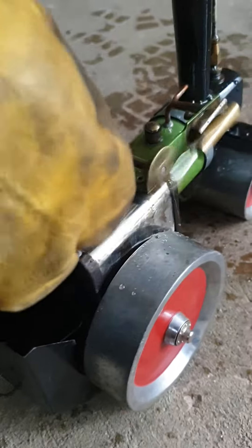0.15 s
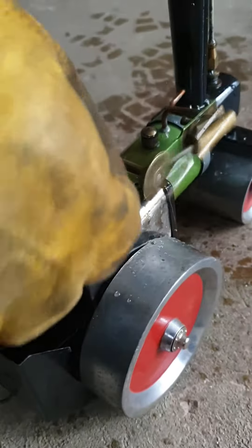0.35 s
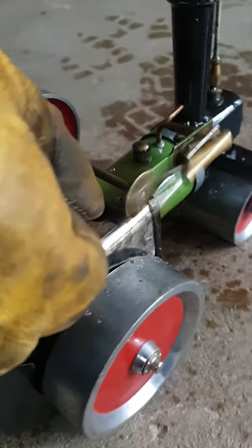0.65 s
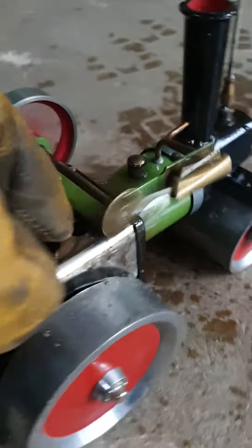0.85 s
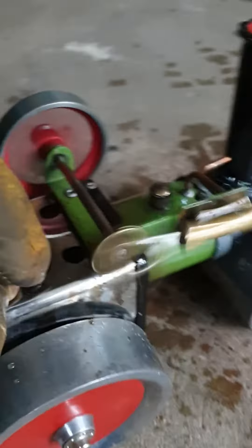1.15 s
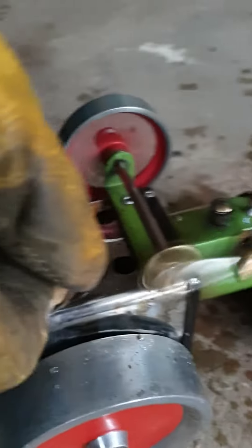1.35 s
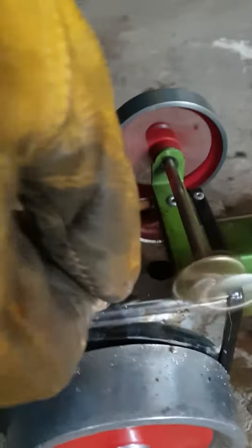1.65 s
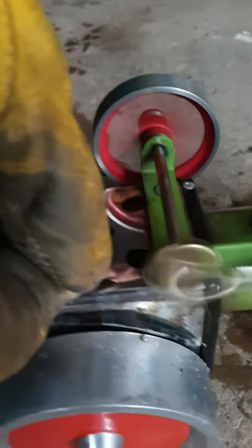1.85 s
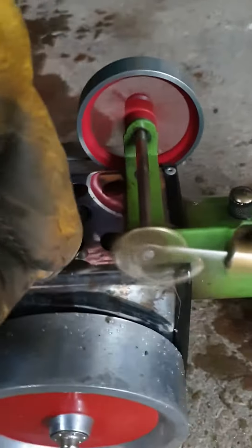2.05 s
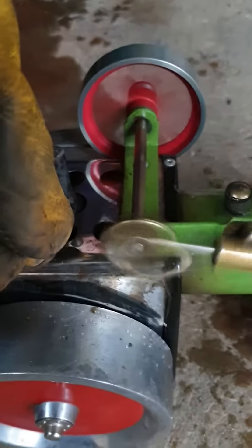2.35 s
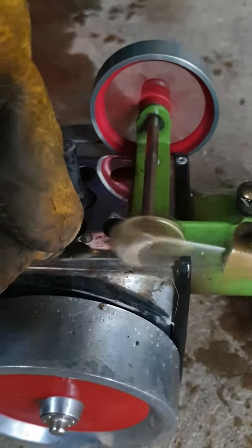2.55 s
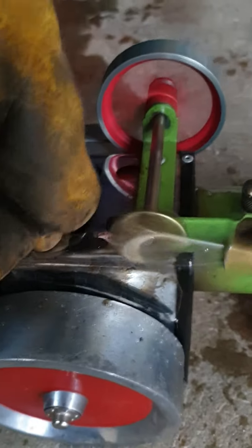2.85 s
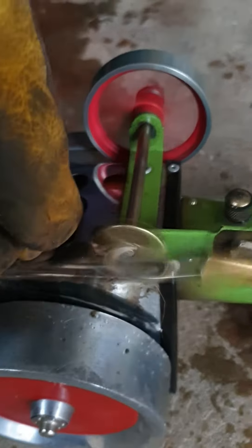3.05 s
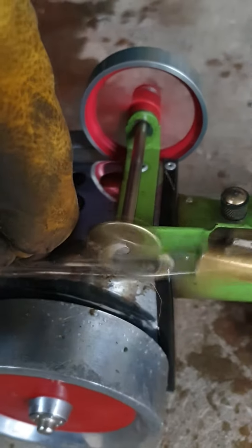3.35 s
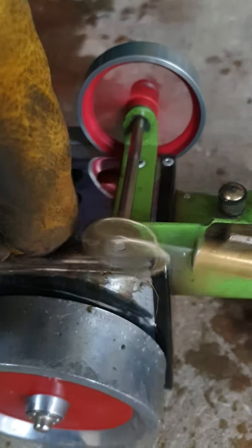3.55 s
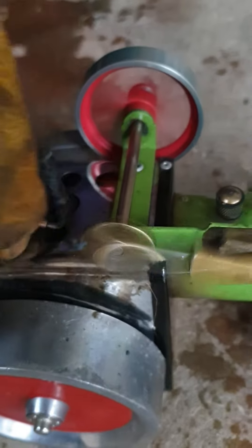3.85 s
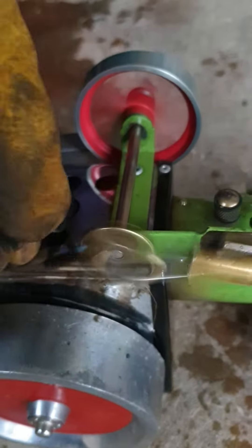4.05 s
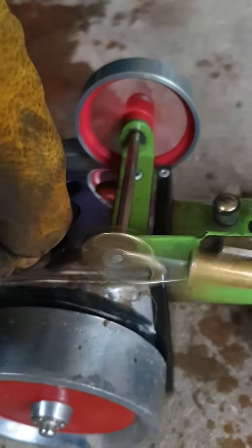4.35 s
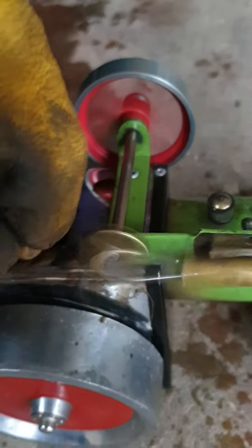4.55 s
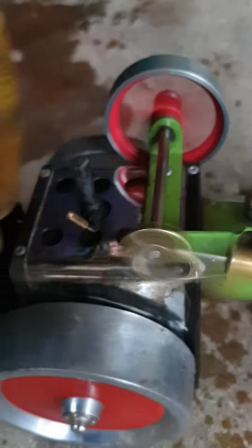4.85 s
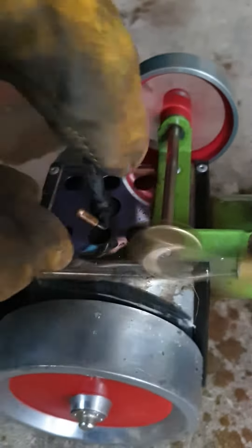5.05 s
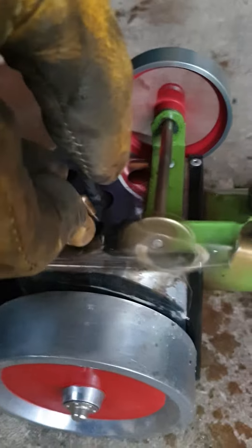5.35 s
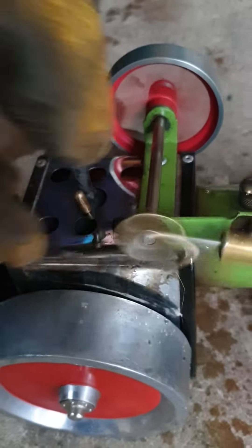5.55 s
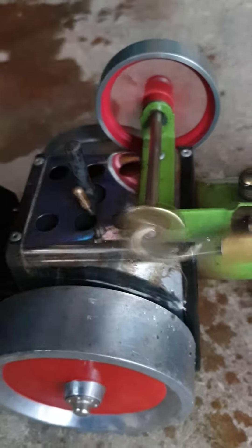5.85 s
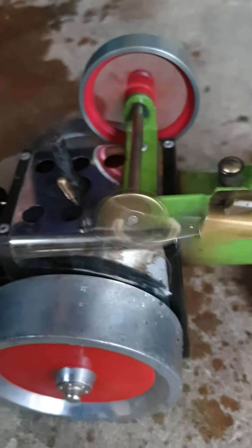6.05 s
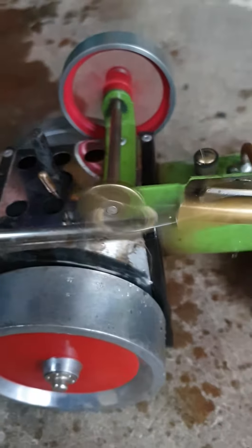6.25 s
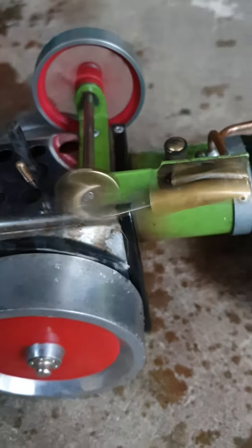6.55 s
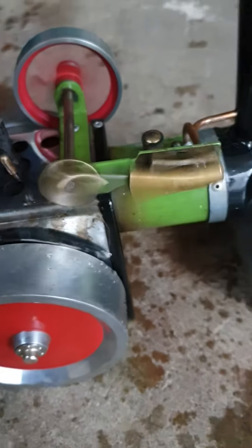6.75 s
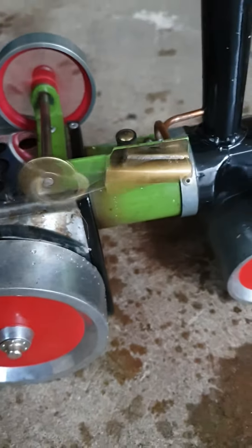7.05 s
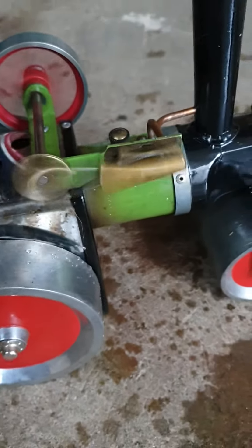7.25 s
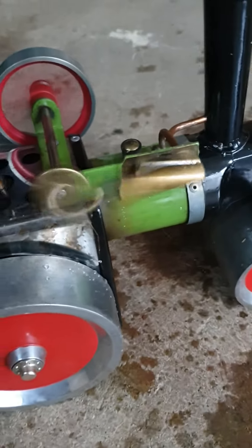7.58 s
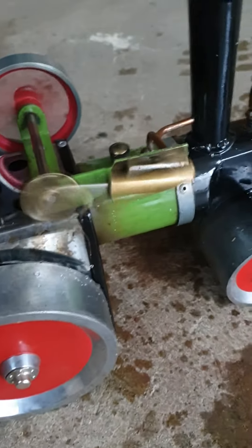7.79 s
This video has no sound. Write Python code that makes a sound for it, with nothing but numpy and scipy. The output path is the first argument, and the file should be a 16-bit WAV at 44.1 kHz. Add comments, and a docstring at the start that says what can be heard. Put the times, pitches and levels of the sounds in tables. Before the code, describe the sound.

A toy steam engine chuffs in a rapid buzzing hiss on a concrete floor while a tiny whistle shrills, then it labours, spits and picks up again.

```python
"""A toy steam engine starts near 34 turns a second on a concrete floor, close to a moving pair of microphones.
Each turn gates steam noise into a chuff, strikes frame resonances in a thud and knocks a loose linkage.
From 1.1 to 4.5 s a gloved hand holds the tiny whistle open: a fluttering sine with octave and hiss. The speed
sags as steam is drawn off, drops under load to 28 turns a second near 5.8 s and recovers to 32.5. Water
spits crack in noise bursts, the hand bumps the frame now and then, and a loose rumble lies underneath."""
import sys
import numpy as np
from scipy import signal
from scipy.fft import rfft, irfft, next_fast_len
from scipy.io import wavfile
from scipy.ndimage import map_coordinates

SR = 44100
rng = np.random.default_rng(int(sys.argv[2]) if len(sys.argv) > 2 else 0)


def nominal_scale(level):
    """Amplitude ratio for a level in decibels (scalar or array-like)."""
    x = np.asarray(level, float) / 20
    return 10 ** x


def dump_mix(stems):
    """Bounce the given channels to the path in sys.argv[1] as a 16-bit WAV at rate SR."""
    frames = np.atleast_2d(stems).T  # one column per channel
    limited = np.clip(frames, -1, 1)  # hard clip at full scale
    pcm = np.round(limited * 32767).astype(np.int16)
    wavfile.write(sys.argv[1], SR, pcm)


N = 349257  # samples

THUD_AT, CLACK_AT = 0.97, 0.2  # crank angles, turns


def rms_one(x):
    """Normalisation by mean power: scale to rms 1."""
    return x / np.sqrt(np.mean(x ** 2) + 1e-20)


def in_time(rows):
    """Linear interpolation: each column of a curve, sample by sample, against the seconds in the first."""
    s, *columns = np.transpose(rows)
    return [np.interp(np.arange(N) / SR, s, c) for c in columns]


def silent_outside(rows, count):
    """A gated curve: its last columns (dB) reach -80 just before the first and just after the last row."""
    first, last = np.array(rows[0], float), np.array(rows[-1], float)
    first[0] -= 0.03
    last[0] += 0.091
    first[-count:] = last[-count:] = -80
    return in_time([first, *rows, last])


def at_hz(points, hz):
    """Interpolation of a spectrum on a log-frequency axis."""
    known_hz, db = np.transpose(points)
    return np.interp(np.log(hz), np.log(known_hz), db)


def drift(rate_hz):
    """Low-pass random process of rms 1: white noise twice through a one-pole filter."""
    r = np.exp(-2 * np.pi * rate_hz / SR)
    noise = signal.lfilter([1], [1, -2 * r, r * r], rng.standard_normal(N + SR))
    return rms_one(noise[SR:])


def ring(clicks, hz, t60):
    """Damped resonance: a unit click sets a decaying sine of height 1 ringing in a two-pole filter."""
    r, w = nominal_scale(-60 / (max(t60, 0.002) * SR)), 2 * np.pi * hz / SR
    return signal.lfilter([0, np.sin(w)], [1, -2 * r * np.cos(w), r * r], clicks + 1e-18)


def pair(x, lag):
    """Arrival-time difference: the left is shifted by lag samples, later if positive, earlier if negative."""
    left = map_coordinates(x, [np.arange(N) - lag], order=3, mode="nearest")
    return np.array([left, x])


def coloured(spectrum, lag):
    """Partly coherent stereo noise: a shared part, its left shifted by lag, plus one of its own per side; rms 1."""
    # Each row: frequency in Hz, left-right likeness from 0 to 1.
    likeness = [(50, 1), (130, 0.56), (300, 0.53), (700, 0.19), (1500, 0.031), (5000, 0.22), (15000, 0.1)]
    size = next_fast_len(N)
    hz = np.maximum(np.arange(size // 2 + 1) * SR / size, 1)
    gain, alike = nominal_scale(at_hz(spectrum, hz)), np.clip(at_hz(likeness, hz), 0, 1)
    white = rfft(rng.standard_normal((3, size)))
    shared = irfft(white[0] * gain * np.sqrt(alike), size)[:N]
    own = irfft(white[1:] * gain * np.sqrt(1 - alike), size)[:, :N]
    return rms_one(pair(shared, lag) + own)


def once_a_turn(turn, angle, wobble, spread_db):
    """A jittered pulse train: one click per crank passage, wobble (turns) and spread being deviations."""
    whole = np.arange(int(turn[-1]) + 1)
    chance = rng.standard_normal((len(whole), 2))
    at = np.searchsorted(turn, whole + angle + wobble * chance[:, 0])
    clicks = np.zeros(N + 1)
    clicks[at] = nominal_scale(spread_db * chance[:, 1])
    clicks[0] = 0
    return clicks[:N]


def clicks_at(rows):
    """Impulses at listed moments (seconds) and strengths (dB)."""
    s, db = np.transpose(rows)
    clicks = np.zeros(N)
    clicks[(s * SR).astype(int)] = nominal_scale(db)
    return clicks


def chuff(turn, loss, front, lag, leak_db):
    """Jet noise gated by the port: a burst that fades until it shuts, over a steady leak; wet steam is grainy."""
    # Exhaust colour from the rear and from the front. Each row: frequency in Hz, density in dB per Hz.
    rear_colour, front_colour = [(650, -20.5), (1100, -19), (2170, -10.5), (2430, -8), (3320, -8.5),
                                 (3750, -10.5), (7000, -13.5), (8650, -2.5), (10000, -13), (14300, -11),
                                 (15800, -1.5)], [(650, -21), (1100, -11), (1550, -8.5), (1940, -4),
                                                     (2370, -14), (2740, -6), (3630, -12), (5730, -9),
                                                     (7240, -15.5), (12000, -9.5), (15800, -16.5)]
    port_open, port_shut = 0.805, 0.57  # crank angle, and time open; turns
    puff_fade, burst_fade = 0.57, 0.1  # turns
    treble_rise, low_rise = 0.025, 0.1  # turns; the low part rises sooner in a labouring engine
    slowing = np.maximum(loss, 0)
    since = turn - port_open
    open_for = since % 1
    strength = nominal_scale(rng.normal(0, 1.1, int(turn[-1]) + 3))[np.floor(since).astype(int) + 1]
    burst = 0.5 + 0.25 * slowing  # extra rush just after opening, larger as the speed drops
    puff = strength * (np.exp(-open_for / puff_fade) + burst * np.exp(-open_for / burst_fade))
    puff = puff * np.clip((port_shut - open_for) / 0.035, 0, 1)
    grain = nominal_scale(1.7 * drift(174))
    steam = np.sqrt(1 - front) * coloured(rear_colour, lag) + np.sqrt(front) * coloured(front_colour, lag)
    low = signal.sosfilt(signal.butter(1, 7900, fs=SR, output="sos"), steam)
    treble = steam - low
    rising = np.minimum(open_for / treble_rise, 1) * treble
    rising = rising + np.minimum(open_for * (1 + slowing) / low_rise, 1) * low
    leak = low + nominal_scale(-8) * treble  # duller than the puff
    return rms_one(grain * (puff * rising + nominal_scale(leak_db) * leak))


def thud(turn, front):
    """Periodic excitation: near-equal piston blows ring the frame modes in lines at multiples of the speed."""
    # Modes of boiler, frame and chimney. Each row: frequency in Hz, t60 in seconds,
    # then relative level in dB heard from the rear, from beside and from the front.
    modes = [(356.7, 0.16, -13, -15.5, 0), (495, 0.029, 0, -3, -24), (564, 0.086, 3, -9, 8),
             (699.4, 0.12, 1, -6, 1), (940.4, 0.098, -6, -17.5, -3), (1005, 0.094, -22, -2, -10),
             (1078, 0.088, -22, -3, -19), (1170, 0.059, -20, -2.5, -4), (1327, 0.12, -50, -14, 18),
             (1717, 0.051, 8, -5, 2), (2126, 0.068, 2.5, 0, 13), (2222, 0.041, 9.5, -17, -10),
             (2720, 0.031, -3, -0.5, 46)]
    blows = once_a_turn(turn, THUD_AT, wobble=0.0008, spread_db=0.8)
    out = 0
    for k, (hz, t60, *side_db) in enumerate(modes):
        level = nominal_scale(np.interp(front, [0, 0.5, 1], side_db))
        out = out + (-1) ** k * level * ring(blows, hz, t60)
    return rms_one(signal.sosfilt(signal.butter(4, 280, "high", fs=SR, output="sos"), out))


def shake(turn, loss, front):
    """Harmonic synthesis: sines locked to the crank angle glide with the speed and pile up near the jolt."""
    # Each row: multiple of the speed, level in dB running heard from the rear, from the front,
    # level in dB labouring.
    harmonics = [(2, -52, -51, -49), (3, -49, -43.5, -52.5), (4, -51.5, -52, -48.5), (5, -40, -40, -61),
                 (6, -56.5, -44.5, -50), (7, -54.5, -37, -54.5), (8, -71, -71, -52), (9, -61, -72, -61.5),
                 (10, -56, -52, -81), (12, -65, -51, -67), (14, -54.5, -50, -66)]
    labour = np.clip(loss / 4.5, 0, 1)  # full at 4.5 turns per s lost
    ahead = np.clip((front - 0.25) / 0.2, 0, 1)
    start = rng.normal(0, 0.8, len(harmonics))  # radians by which the tones miss the jolt
    out = 0
    for (k, rear_db, front_db, labour_db), a in zip(harmonics, start):
        running_db = rear_db + ahead * (front_db - rear_db)
        db = (1 - labour) * running_db + labour * labour_db + 1.1 * drift(1.5)
        out = out + np.sqrt(2) * nominal_scale(db) * np.sin(2 * np.pi * round(k) * (turn - THUD_AT) + a)
    return out


def linkage(turn, clack_db):
    """Impact excitation: play in the rod knocks twice a turn, each a short noisy rattle striking all modes."""
    # What the loose linkage rings with. Each row: frequency in Hz, relative level in dB, t60 in seconds.
    modes = [(1869, 0.5, 0.048), (1959, -1, 0.058), (4740, -4.5, 0.016)]
    # The loudest clacks. Each row: start in seconds, strength of the knock in dB.
    loud_clacks = [(3.5586, -19.5), (4.048, -26), (4.2011, -21), (4.7871, -6.5), (4.909, -17), (5.002, -17),
                   (5.067, -18), (5.305, -17), (5.727, -15), (5.8682, -17), (6.0079, -21), (7.266, -27),
                   (7.3359, -24)]
    knocks = nominal_scale(clack_db) * once_a_turn(turn, CLACK_AT, wobble=0.01, spread_db=2.5)
    knocks += nominal_scale(clack_db + 1.5) * once_a_turn(turn, 0.93, wobble=0.033, spread_db=0.5)  # rod's return
    knocks += clicks_at(loud_clacks)
    rattle = np.exp(-np.arange(200) / (0.00099 * SR))
    rattle = rattle / np.sqrt(np.sum(rattle ** 2))
    out = 0
    for hz, db, t60 in modes:
        shaken = signal.lfilter(rattle, [1], knocks) * rng.standard_normal(N)
        out = out + nominal_scale(db) * ring(shaken, hz, t60)
    return out


def spits_and_ticks(turn, clack_db, lag):
    """Exponentially decaying noise: large spits crack brightly; each clack adds a brief bright tick."""
    # Water drops spat out. Each row: start in seconds, strength in dB.
    large_spits = [(2.4371, -3.5), (5.0011, -8), (5.0648, -3.5), (5.0988, -11), (5.1665, -11), (5.3375, -5),
                   (5.441, -10), (5.4783, -12), (5.762, -11.5), (5.833, -11), (5.8385, -16),
                   (5.9732, -10.5), (6.066, -13), (6.247, -15), (6.2906, -11), (6.4345, -13), (6.8955, -9)]
    clack_ticks = nominal_scale(clack_db + 1.5) * once_a_turn(turn, CLACK_AT, wobble=0.02, spread_db=5.5)
    cracks = clack_ticks + clicks_at(large_spits)
    decay_s = 0.0009
    decay = signal.lfilter([1], [1, -np.exp(-1 / (decay_s * SR))], cracks + 1e-18)
    bright = [(2500, -49), (5000, 10.5), (7000, -0.5), (9500, 7.5), (16000, -3.0)]  # (Hz, dB per Hz)
    return decay * coloured(bright, lag)


def whistle(lag):
    """An edge tone in a tiny pipe: wet steam flutters its pitch and strength; weak octave, breath and hiss."""
    # The tone. Each row: time in seconds, pitch in Hz, level in dB.
    notes = [(1.083, 7300, -25), (1.09, 7400, -6.5), (1.13, 7450, -10), (1.36, 7390, -8), (1.41, 7454, -6),
             (1.53, 7490, -6.5), (1.575, 7300, -7), (1.61, 7302, -9.5), (1.79, 7380, -12),
             (1.97, 7320, -14.5), (2.11, 7520, -10), (2.17, 7610, -14), (2.55, 7605, -10.5),
             (2.64, 7590, -17), (2.81, 7550, -8), (2.87, 7510, -3.5), (2.94, 7550, -14.5),
             (3.05, 7476, -17), (3.54, 7394, -16), (3.61, 7340, -13), (3.7, 7330, -4.5), (3.81, 7360, -17),
             (3.9, 7330, -10.5), (4.03, 7436, -9), (4.06, 7333, -7.5), (4.2, 7280, -12),
             (4.46, 7340, -14.5), (4.5, 7160, -18), (4.55, 7020, -29)]
    # Its place between the microphones. Each row: time in seconds, left over right in dB,
    # phase by which the left leads in radians.
    sides_rows = [(1.1, -7.5, -2), (1.83, -2.5, 0.67), (2.09, -5, 0.9), (2.18, -3, 1), (2.44, 0, 1.65),
                  (2.63, 0.5, 1.2), (3.17, 11, -1.5), (3.68, 0.5, 1), (4.21, 5.5, -1.5), (4.5, 4, -1.6)]
    # The overtone comes and goes. Each row: time in seconds, level in dB against the tone.
    octave = [(1.1, -21), (1.55, -26), (1.65, -33), (2.1, -26), (2.2, -38), (2.95, -38), (3.1, -19),
              (3.55, -21), (3.7, -40), (3.95, -22), (4.5, -21)]
    # Steam escaping at the valve. Each row: time in seconds, broad hiss in dB,
    # breathy band around and above the tone in dB.
    valve = [(1.07, -43, -26.5), (1.8, -43, -26.5), (2.9, -37, -20), (3.6, -33, -24.5), (4.52, -27, -22)]
    # Colour of the breath and of the hiss. Each row: frequency in Hz, density in dB per Hz.
    breath_colour, hiss_colour = [(6700, -31), (7300, -5.5), (7900, -14), (8200, -14.5), (9000, -24)], [(2000, -3), (6500, -2.5), (9500, 3), (12000, -1),
                                                          (16000, -15)]
    hz, tone_db = silent_outside(notes, count=1)
    pan_db, lead = in_time(sides_rows)
    pan_db = pan_db + 2.2 * drift(8.0)
    flutter = drift(220)  # moves pitch and strength together
    hz = hz + 8.52 * drift(9.34) + 27.0 * drift(45.5) + 12 * flutter + 15 * drift(360)
    phase = 2 * np.pi * np.cumsum(hz) / SR
    swell = 1 + 0.2 * drift(25) + 0.19 * flutter + 0.012 * drift(540)
    phases = np.array([phase + lead, phase])
    share = nominal_scale(np.array([pan_db, -pan_db]) / 2)
    level = nominal_scale(tone_db) * share / np.sqrt(np.mean(share ** 2, axis=0))
    wave = np.sin(phases) + nominal_scale(in_time(octave)[0]) * np.sin(2 * phases)
    tone = np.sqrt(2) * swell * level * wave
    hiss_db, breath_db = silent_outside(valve, count=2)
    breath = nominal_scale(breath_db + 2.0 * drift(33)) * coloured(breath_colour, lag)
    hiss = nominal_scale(hiss_db + 2.4 * drift(29)) * coloured(hiss_colour, lag)
    return tone + breath + hiss


def bumps():
    """Modal impact: a gloved hand knocks softly on the frame, three modes each, with two weaker bounces."""
    # Each row: start in seconds, strength in dB, lowest mode in Hz, t60 in seconds.
    touches = [(0.344, -38, 157, 0.044), (1.085, -36, 70., 0.065), (2.065, -32, 55, .08),
               (2.79, -31, 90, 0.07), (3.659, -33, 48., .07), (5.232, -22, 1060, 0.016),
               (7.051, -20.5, 186, 0.024)]
    out = 0
    for s, db, hz, t60 in touches:
        hits = clicks_at([(s + 0.035 * n, db - 4.5 * n) for n in range(3)])  # the frame rocks back twice
        modes = sum(ring(hits, hz * k, t60) for k in (1, 1.4, 2.1))
        glove = signal.butter(2, [0.6 * hz, 2.0 * hz], "band", fs=SR, output="sos")
        out = out + signal.sosfilt(glove, modes)
    return out


def surroundings(x):
    """Early reflections from floor and walls: short echoes, the first and third swapped between the sides."""
    # Each row: delay in seconds, level in dB.
    echoes = [(.0031, -12.5), (.0074, -14), (.015, -12.5)]
    out = x.copy()
    for k, (s, db) in enumerate(echoes):
        late = int(s * SR)
        out[:, late:] += nominal_scale(db) * x[::(-1) ** (k + 1), :-late]
    return out


def rumble(thud_db):
    """Filtered noise: a loose rumble through the floor that follows the thud's level and slowly sways."""
    # Each row: frequency in Hz, density in dB per Hz.
    colour = [(15, -37), (25, -21), (70, -42), (296, -15), (684, -0.5), (854, -13), (1100, -35),
              (1430, -44), (2420, -120)]
    return nominal_scale(thud_db - 11 + 1.5 * drift(0.38)) * coloured(colour, 0)


def handling(loss):
    """Incoherent low noise: a lumpy stir at the microphone ports, calmer as the engine slows."""
    # Each row: frequency in Hz, density in dB per Hz.
    colour = [(28, -20), (55, 5), (100, -2), (160, -41)]
    hz = np.maximum(np.arange(N // 2 + 1) * SR / N, 1)
    noise = irfft(rfft(rng.standard_normal((2, N))) * nominal_scale(at_hz(colour, hz)), N)
    return nominal_scale(-2.5 * loss) * nominal_scale(-53 + 7.7 * drift(1.5)) * rms_one(noise)


def scene():
    """Superposition: crank angle, the integral of speed, drives the engine; whistle, rumble and stir are added."""
    # Crank speed. Each row: time in seconds, turns per second.
    speed_rows = [(0.0, 33.935), (2.0, 33.415), (3.7, 32.844), (4.75, 32.41), (5.0, 30.659), (5.3, 29.227),
                  (5.75, 28.139), (6.3, 30.075), (6.9, 31.624), (7.4, 32.257), (7.92, 32.549)]
    # Where the microphones are. Each row: time in seconds, side from 0 rear to 1 front,
    # left over right in dB, shift of the left in samples (negative is earlier),
    # usual clack strength in dB, reference level in dB for thud and rumble.
    listener = [(0, 0.17, -1.5, -2, -57, -33.5), (1.2, 0.28, -3.5, -1, -49, -34),
                (3, 0.31, -1.5, -5, -34, -34.5), (4.5, 0.23, -4, -5, -30.5, -31),
                (4.95, 0.5, 1, -16.5, -27.5, -30.5), (5.75, 0.45, 2.5, -14, -25, -34),
                (6.2, 0.35, -0.5, -4.5, -38, -35.5), (6.9, 0.61, -0.5, -4.5, -32, -32.5),
                (7.92, 0.57, -1, -2.5, -37, -31)]
    speed, = in_time(speed_rows)
    turn = 0.118 + np.cumsum(speed) / SR
    loss = 33.0 - speed  # turns per s below free running
    front, pan_db, lag, clack_db, thud_db = in_time(listener)
    front = np.clip(front, 0, 1)
    solid = nominal_scale(thud_db - 4.5) * thud(turn, front) + linkage(turn, clack_db)
    solid = solid + shake(turn, loss, front) + bumps()
    solid = surroundings(pair(solid, lag))
    leak_db = -2.5 - 0.8 * loss  # against the puff; a labouring engine leaks less
    steam = nominal_scale(-25 - 0.16 * loss) * chuff(turn, loss, front, lag, leak_db)
    engine = solid + steam + spits_and_ticks(turn, clack_db, lag)
    engine = engine * nominal_scale(np.array([pan_db, -pan_db]) / 2)
    return engine + whistle(lag) + rumble(thud_db) + handling(loss)


def gain_control(x):
    """Feed-forward compression: loud sound turns the gain down quickly; it creeps back slowly."""
    start_db, deepest_cut_db = -23, 8.5
    read_s, down_s, back_s = 0.06, 0.2, 2.4  # time constants
    step = SR // 100  # 10 ms
    r = np.exp(-1 / (read_s * SR))
    power = signal.lfilter([1 - r], [1, -r], np.mean(x ** 2, axis=0))
    level_db = 10 * np.log10(power[::step] + 1e-12)
    gain_db = [0.]
    for want in np.clip(start_db - level_db, -deepest_cut_db, 0):
        time_s = down_s if want < gain_db[-1] else back_s
        gain_db.append(want + (gain_db[-1] - want) * np.exp(-step / SR / time_s))
    return x * nominal_scale(np.interp(np.arange(N) / step, np.arange(len(gain_db)), gain_db))


def low_pass(x):
    """Removes everything above the highest recorded frequency."""
    return signal.sosfilt(signal.butter(12, 16490, fs=SR, output="sos"), x)


def record(dry):
    """Band-limiting and saturation: deep bass is lost, gain control acts, peaks are rounded, the top is cut."""
    top = 0.75  # height towards which peaks are rounded
    bass_cut = signal.sosfilt(signal.butter(2, 35, "high", fs=SR, output="sos"), dry)
    rounded = top * np.tanh(gain_control(bass_cut) / top)
    mix = signal.sosfilt(signal.cheby2(12, 60, 16200, fs=SR, output="sos"), rounded)
    return low_pass(mix)


dry = scene()
out = record(dry)
dump_mix(out)
```